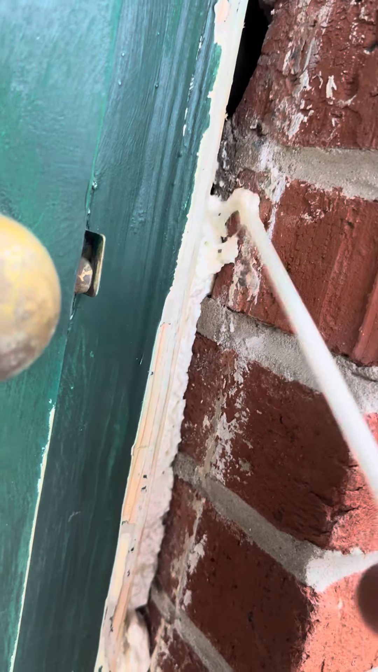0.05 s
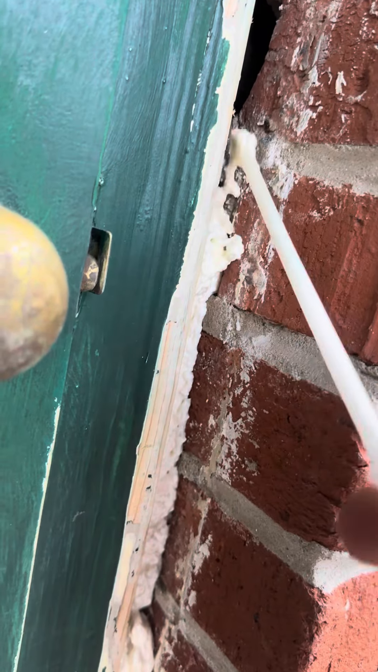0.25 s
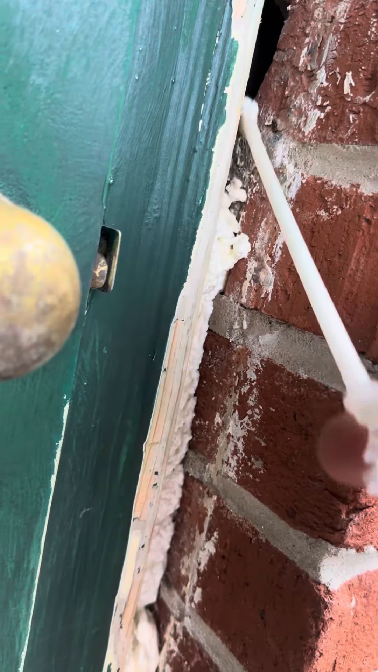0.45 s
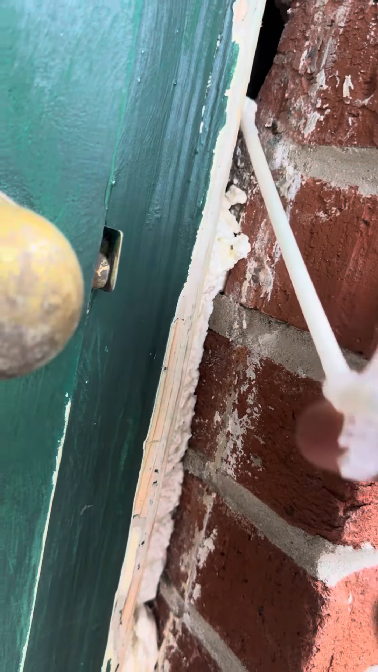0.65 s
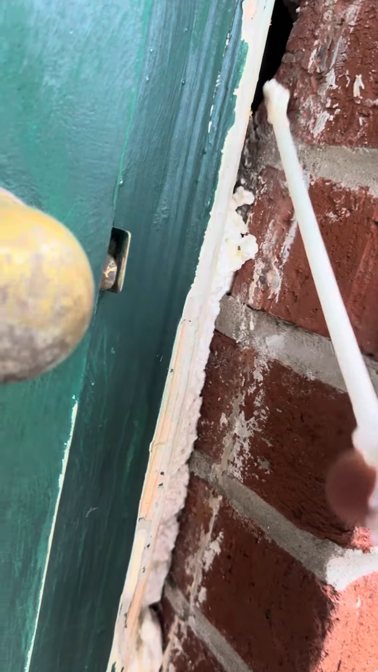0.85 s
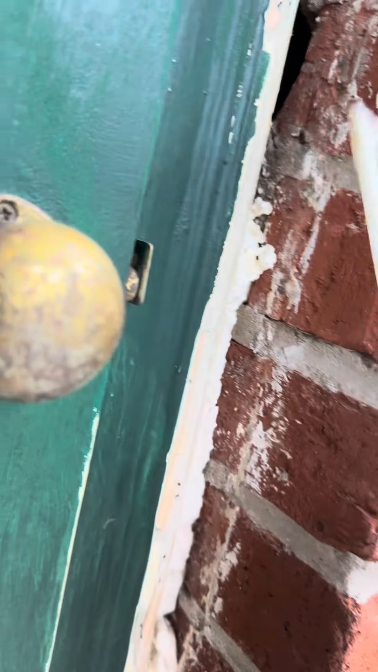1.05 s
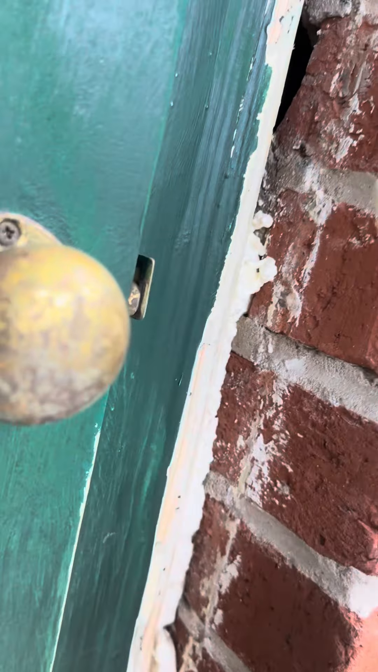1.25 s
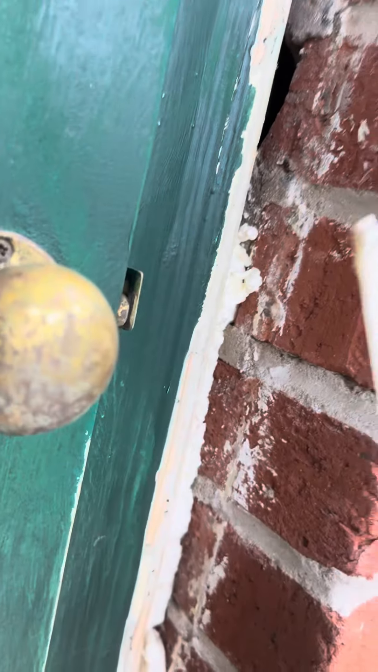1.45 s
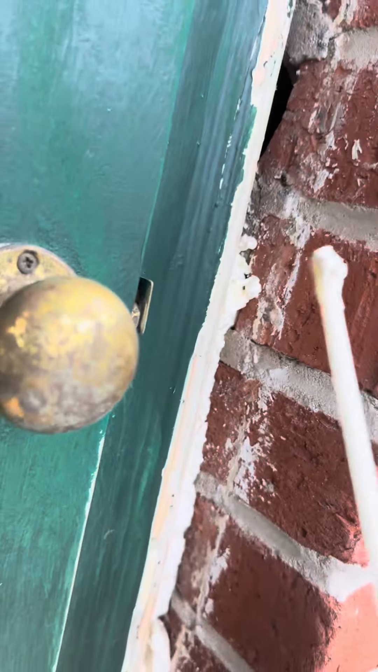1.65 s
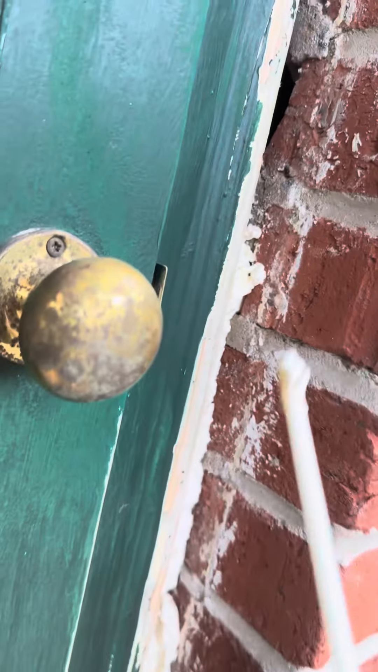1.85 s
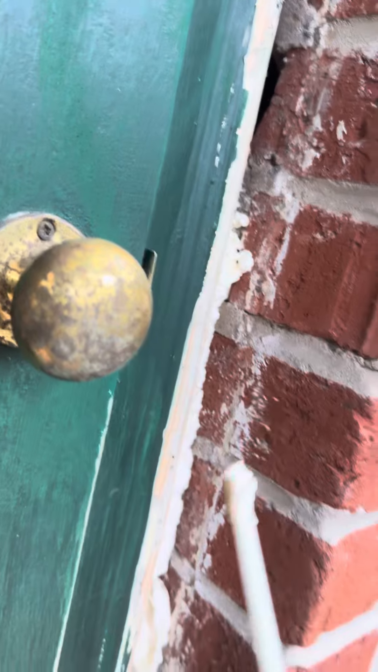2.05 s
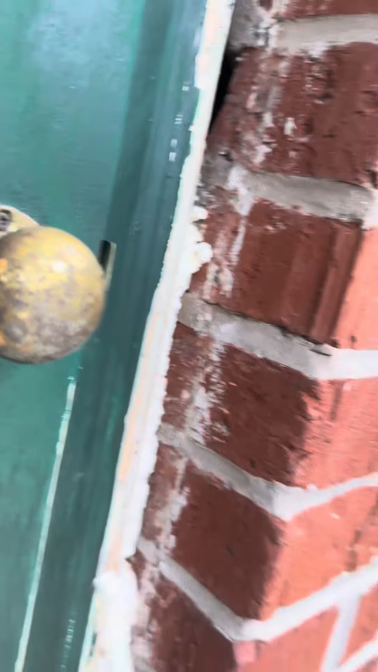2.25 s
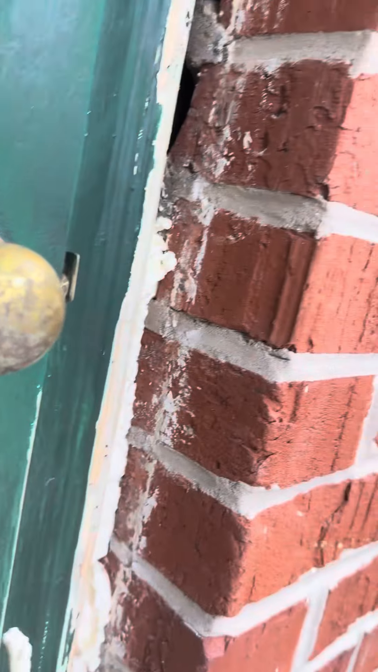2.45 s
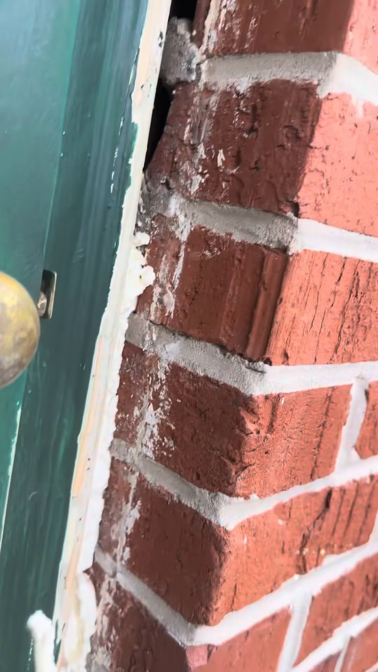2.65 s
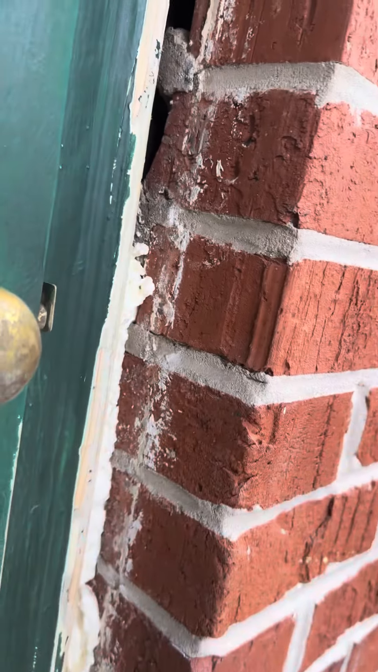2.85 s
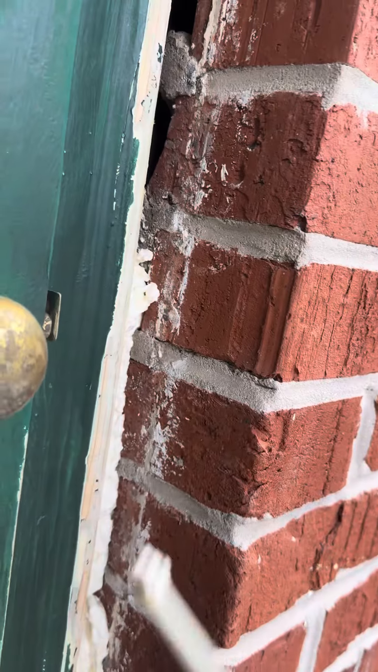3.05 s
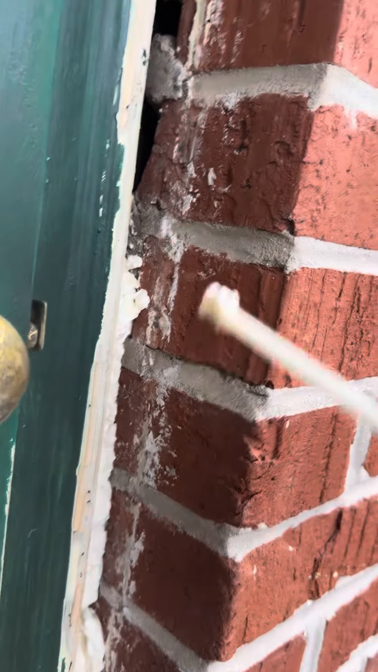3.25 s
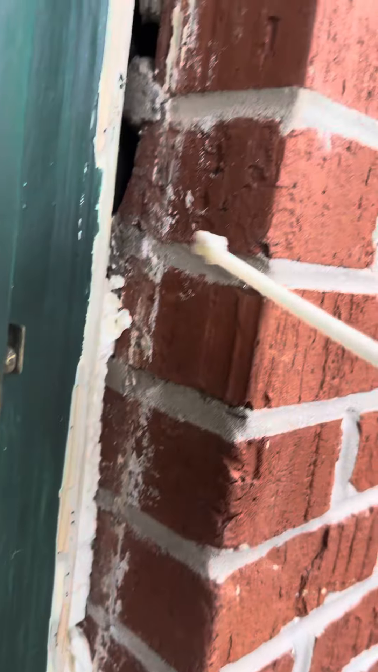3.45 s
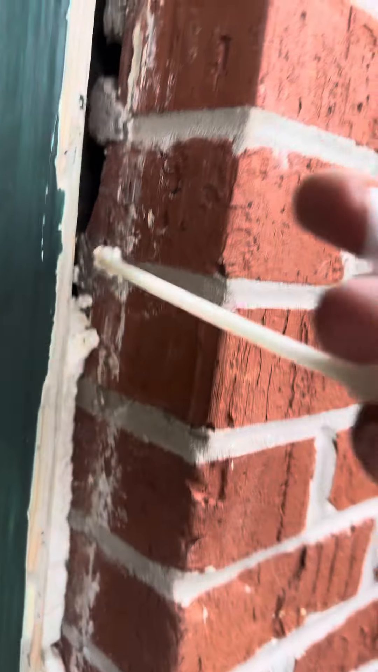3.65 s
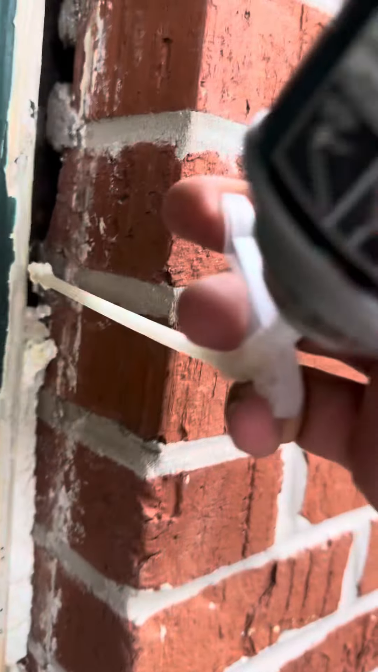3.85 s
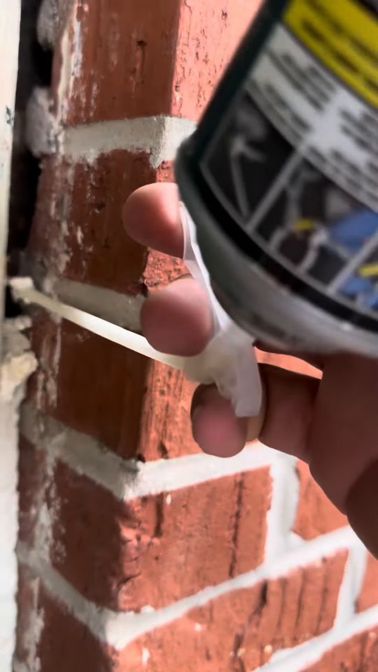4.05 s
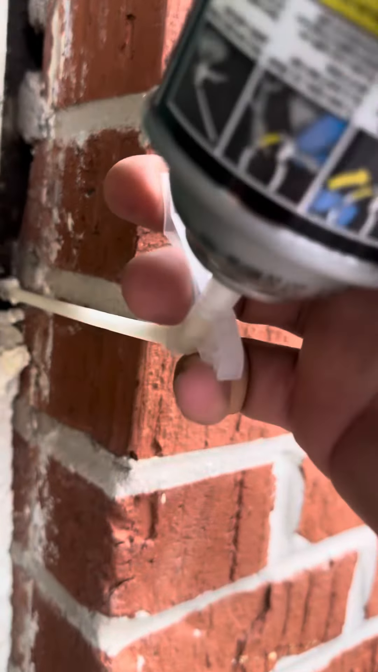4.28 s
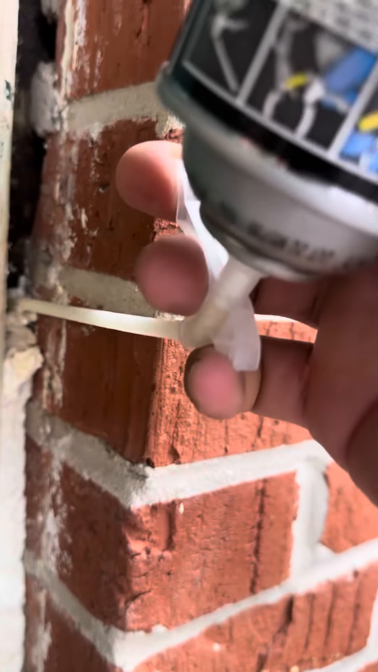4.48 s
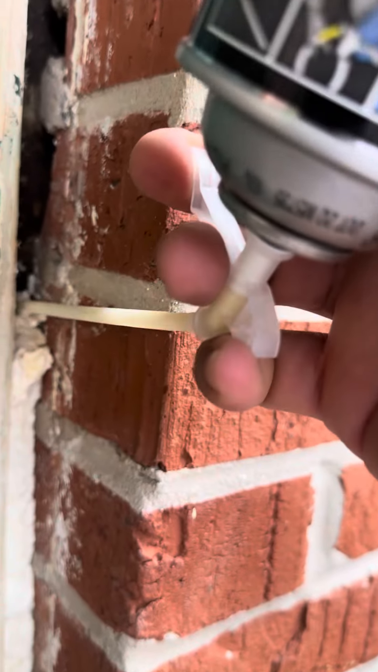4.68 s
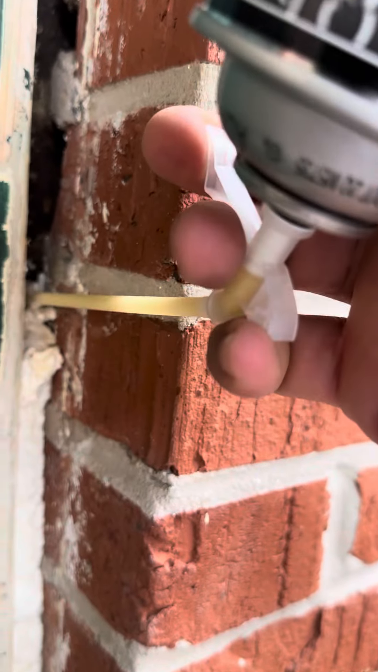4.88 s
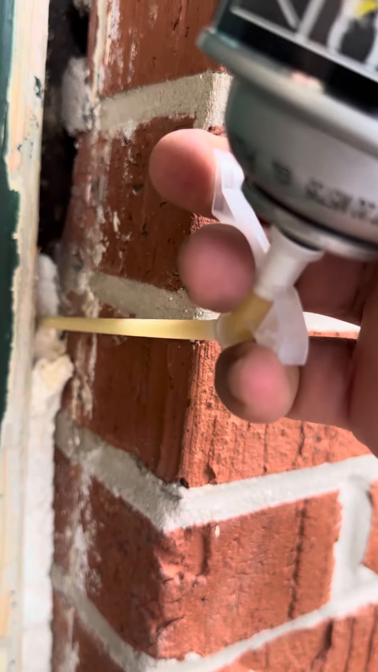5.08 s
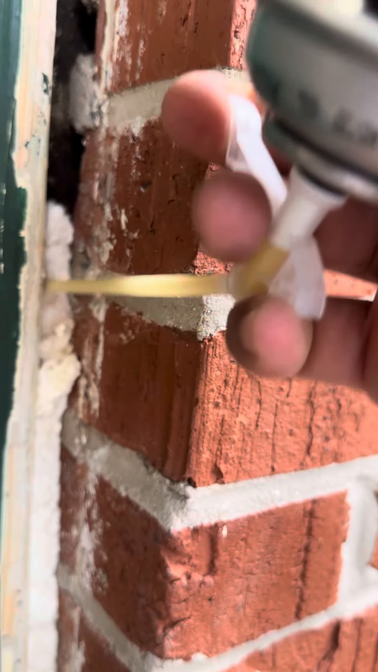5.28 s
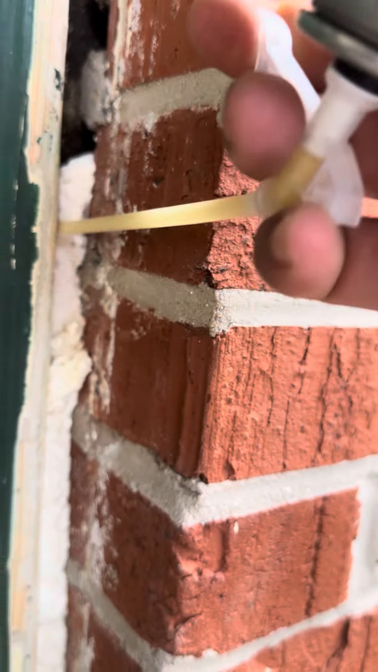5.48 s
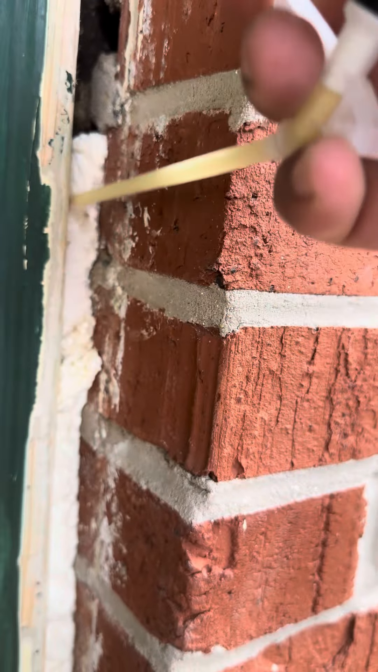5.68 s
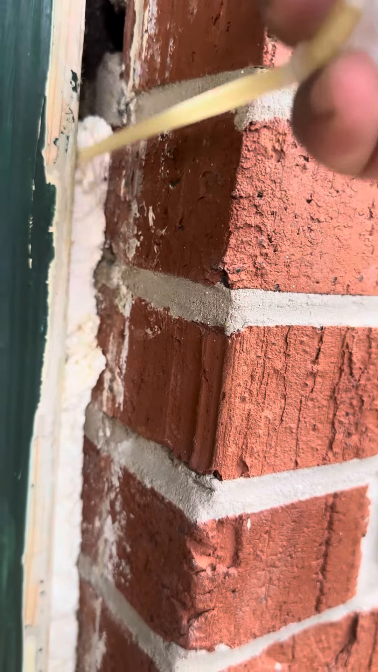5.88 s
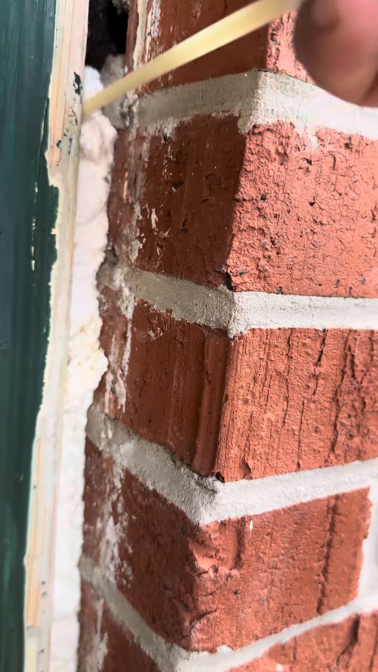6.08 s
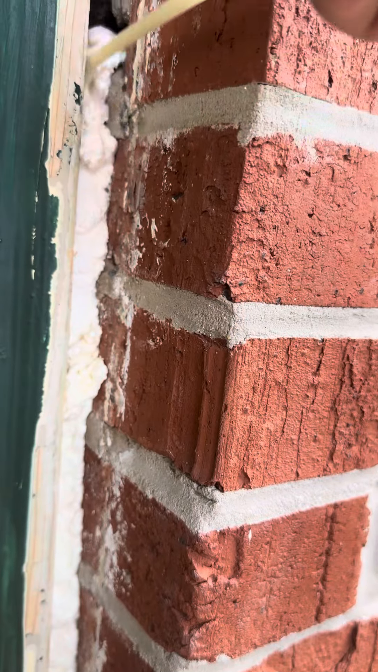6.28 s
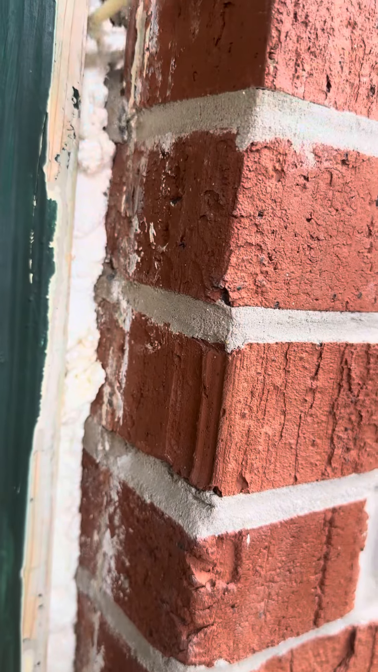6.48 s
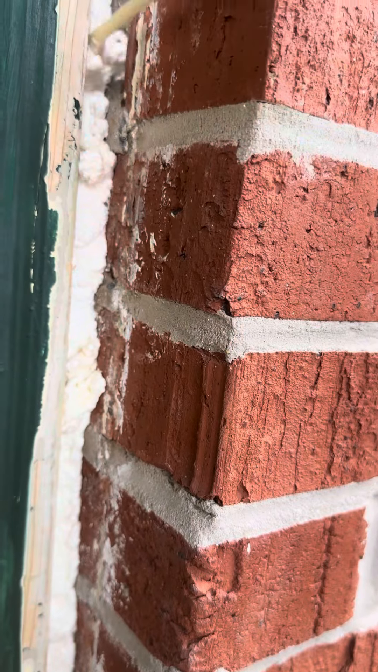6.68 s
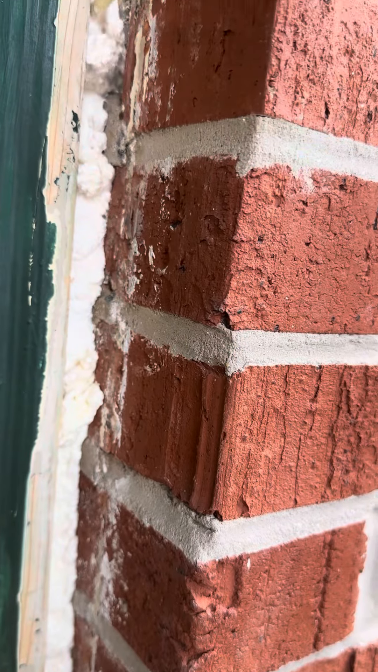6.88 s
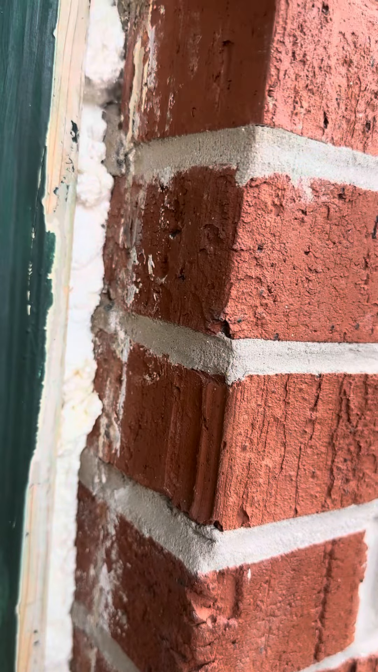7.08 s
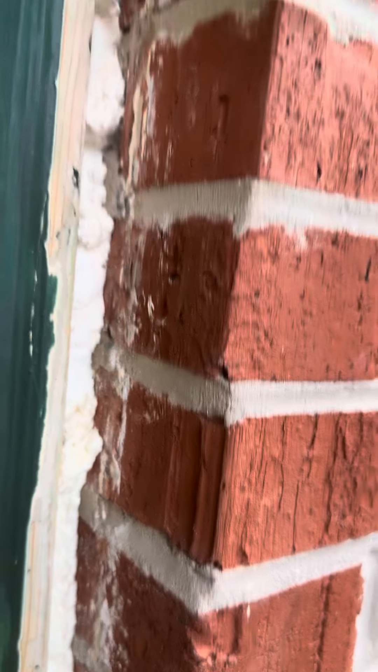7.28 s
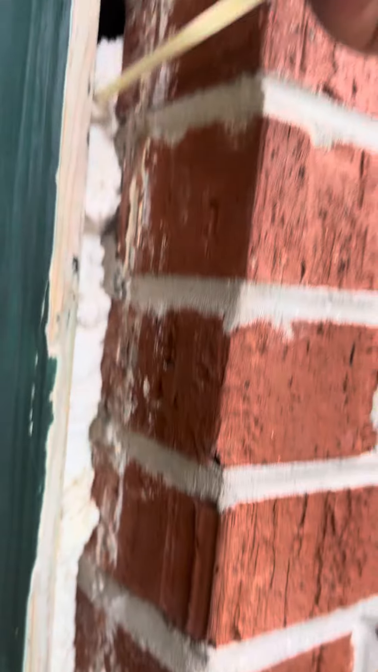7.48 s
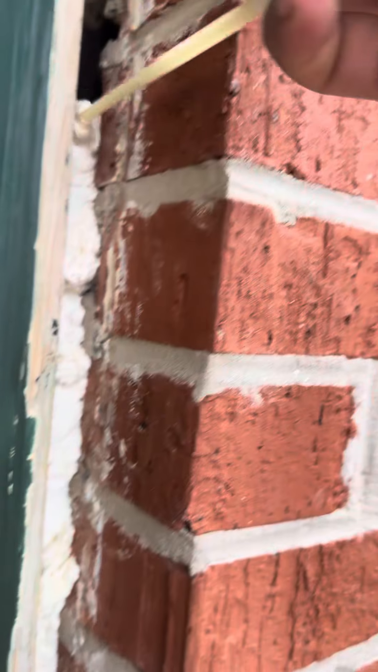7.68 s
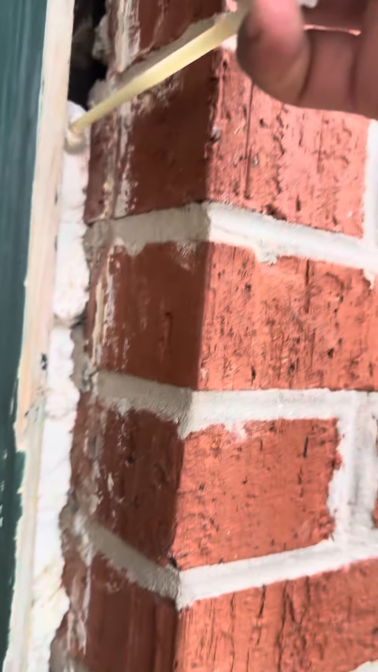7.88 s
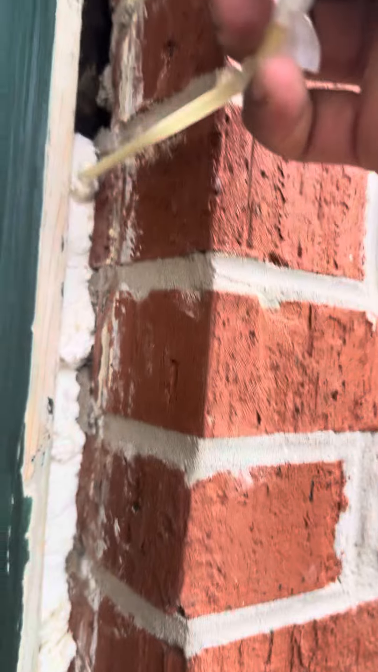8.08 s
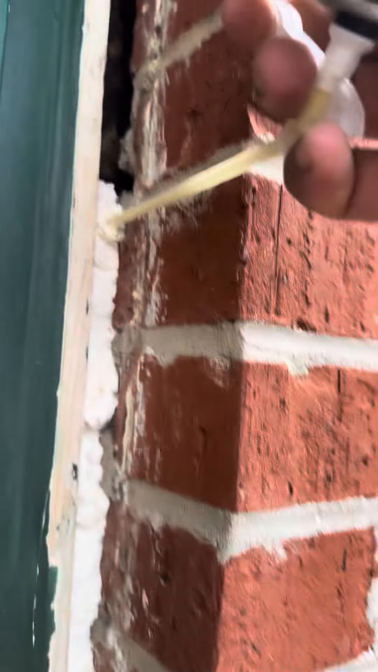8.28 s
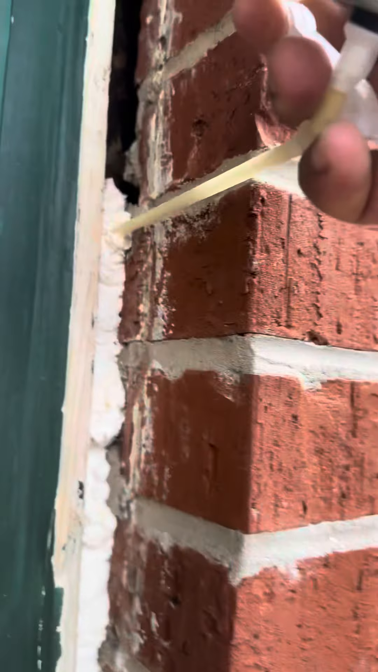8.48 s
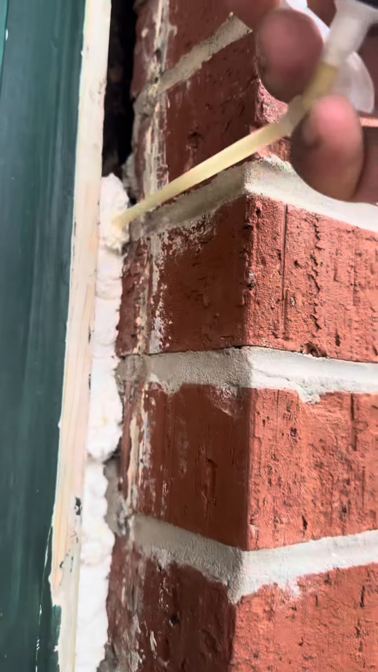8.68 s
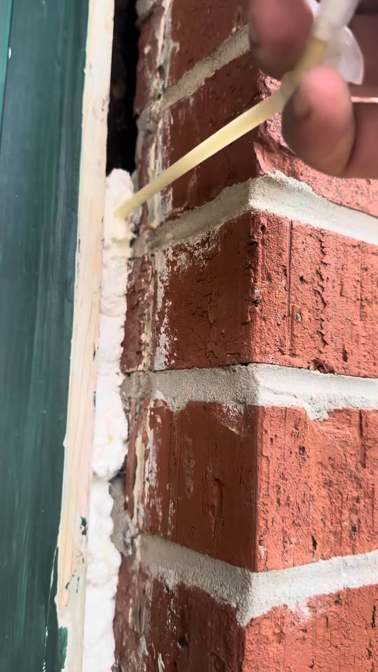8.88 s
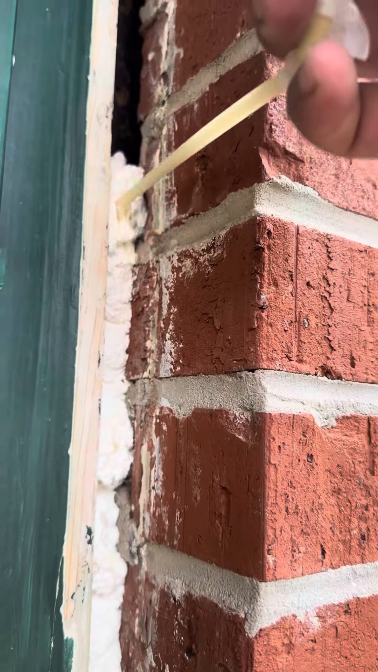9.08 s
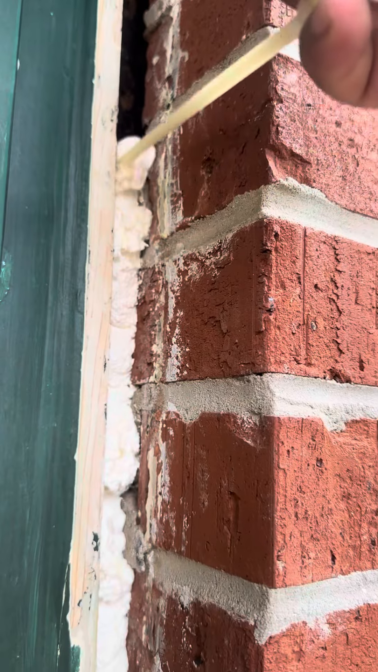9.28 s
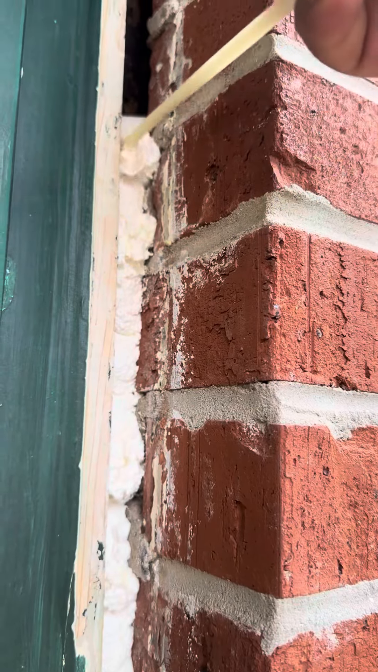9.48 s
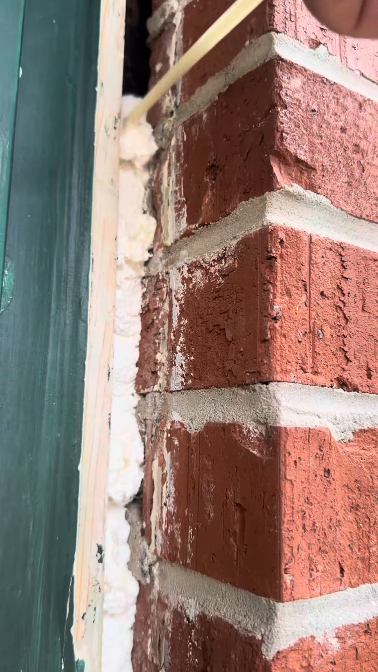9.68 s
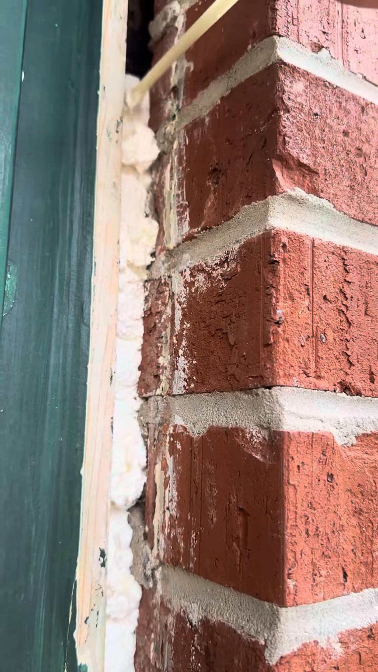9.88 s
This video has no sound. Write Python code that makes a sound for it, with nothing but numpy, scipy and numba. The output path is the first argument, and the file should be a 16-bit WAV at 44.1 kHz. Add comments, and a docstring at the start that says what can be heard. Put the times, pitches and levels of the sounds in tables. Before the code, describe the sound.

Quiet plastic clicks outdoors with a distant low hum, followed by a close, crackling, gurgling rush of expanding foam through a thin straw.

```python
"""An aerosol can squirts expanding foam through a thin straw into a gap by a door frame, close to a phone.
Random clicks stand for bursting cells; they ring the straw, gap and tip, duller when the tip is buried.
Before that, fingers tick and rustle on the can (fading tones, crackle), then propellant leaks (noise, clicks).
A distant machine hums (a tone of changing level) over town rumble (bands of noise)."""
import sys
import numpy as np
from scipy import signal
from scipy.fft import rfft, irfft, next_fast_len
from scipy.io import wavfile
from scipy.ndimage import uniform_filter1d
from numba import njit

SR = 44100
rng = np.random.default_rng(int(sys.argv[2]) if len(sys.argv) > 2 else 0)


def master(y):
    """Save y as 16-bit WAV."""
    cut = np.clip(np.atleast_2d(y).T, -1, 1)
    pcm = np.round(cut * 32767)  # scale
    wavfile.write(sys.argv[1], SR, pcm.astype(np.int16))


N = 438354  # length in samples


def undb(db):
    """Turn decibels into an amplitude factor."""
    return 10 ** (np.asarray(db) / 20)


def level(x, db):
    """Scale a sound to a given average (rms) level in dB."""
    return x * undb(db) / np.sqrt(np.mean(x ** 2))


def noise():
    """Plain random hiss, equally strong at all pitches."""
    return rng.standard_normal(N)


def curves(table):
    """Columns of a table as smooth-running curves, and a gate that is open within its span."""
    s, *columns = np.transpose(table)
    t = np.arange(N) / SR
    is_open = 1. * ((t >= s[0]) & (t <= s[-1] + .01))
    gate = uniform_filter1d(is_open, 400, mode="nearest")
    return [gate] + [np.interp(t, s, c) for c in columns]


@njit
def sweep(x, hz, width, low):
    """State-variable filter with a moving centre: band-pass of gain 1, or low-pass when low is 1."""
    y, b, l = np.empty(len(x)), 0., 0.
    for i in range(len(x)):
        g, k = np.tan(np.pi * hz[i] / SR), width / hz[i]
        v = (b + g * (x[i] - l)) / (1 + g * (g + k))
        y[i] = (1 - low) * k * v + low * (l + g * v)
        b, l = 2 * v - b, l + 2 * g * v
    return y


def band(x, hz, width, low=0.):
    """Keep the pitches around hz (fixed or moving), or mostly those below it when low is near 1."""
    return sweep(x + 1e-18, hz * np.ones(N), float(width), low)


def steep(x, hz, width):
    """The same band filter twice, so its sides fall faster."""
    return band(band(x, hz, width), hz, width)


def walk(rate):
    """Random drift around 0: levels held 1 / rate seconds, then smoothed twice; spread about a third."""
    k = int(SR / rate)
    steps = np.repeat(rng.standard_normal(N // k + 1), k)
    return 0.44 * uniform_filter1d(uniform_filter1d(steps, k), k)[:N]


def bursts(rate, spread_db):
    """Bursting bubbles: about rate clicks a second at random moments, a few far bigger than the rest."""
    out, at = np.zeros(N), np.flatnonzero(rng.random(N) < rate / SR)
    size, sign = rng.random((2, N // 3))[:, :len(at)]
    size_db = spread_db * np.minimum(-np.log(1 - size), 4)
    out[at] = np.sign(sign - .5) * undb(size_db)
    return out


def ring(source, modes, flicker_db):
    """Broad resonances, each rung by its own share of the source and flickering alone."""
    total = 0
    for hz, width, db in modes:
        total = total + level(steep(source(), hz, width), db) * undb(flicker_db * walk(21))
    return level(total, 0)


def colour(x, points):
    """Filter through (frequency [Hz], gain [dB]) points joined on a log-frequency axis."""
    hz, db = np.transpose(points)
    size = next_fast_len(N)
    bins_hz = 1 + np.arange(size // 2 + 1) * SR / size
    gain = undb(np.interp(np.log(bins_hz), np.log(hz), db))
    return irfft(rfft(x, size) * gain, size)[:N]


def puffs(table, t60):
    """Envelope that jumps at each (time [s], level [dB]) and falls 60 dB in t60 seconds."""
    out, t = np.zeros(N), np.arange(SR // 2) / SR
    for s, db in table:
        i = int(s * SR)
        out[i:i + len(t)] += (undb(db) * 10 ** (-3 * t / t60))[:N - i]
    return out


def swells(table):
    """Sum of bell-shaped changes in dB, one for each (time [s], length [s], change [dB])."""
    t = np.arange(N) / SR
    return sum(db * np.exp(-((t - s) / length) ** 2) for s, length, db in table)


def town():
    """Third-octave bands of far rumble that swell together and flicker alone."""
    # tone of the rumble before the whole is set to its level:
    # (frequency [Hz], relative level [dB per Hz])
    spectrum = [(15, -40), (25, -2.5), (134, 1.5), (156, -27.5), (186, -9.5), (251, -14), (356, -21),
                (458, -16), (574, -21.5), (2460, -38), (2780, -40), (5910, -44), (10000, -134),
                (13000, -103), (22000, -120)]
    hz_at, db_at = np.transpose(spectrum)
    out, swell = 0, walk(0.55)
    for hz in 28 * 2 ** np.arange(0, 8.4, 1 / 3):
        db = np.interp(np.log(hz), np.log(hz_at), db_at) + 10 * np.log10(hz)
        db = db + 0.27 * swell + 0.47 * walk(6.5)
        out = out + undb(db) * level(steep(noise(), hz, hz / 3), 0)
    return level(out, -45.5)


def machine():
    """A hum that swells and fades like beating tones, and a few blurred lower and higher tones."""
    # turning points of the hum, before a small random wobble: (time [s], pitch [Hz], level [dB rms])
    turning_points = [(0, 129.4, -49), (.39, 134.3, -43), (.8, 130.8, -53), (1.05, 130.4, -50),
                      (1.3, 132.5, -63), (1.68, 132, -41), (1.98, 132.3, -57), (2.27, 132.3, -38.5),
                      (2.6, 132.4, -58), (2.9, 130.6, -38), (3.26, 129.6, -43.5), (3.7, 130.8, -35.5),
                      (4.3, 129.4, -58), (4.52, 129, -54), (4.95, 130, -33.5), (5.25, 132.4, -39),
                      (5.45, 129, -55), (5.62, 130, -62), (5.8, 130.2, -53), (6.23, 130, -33.5),
                      (6.6, 130.5, -46), (6.779, 131, -63), (7.04, 129.5, -47), (7.2, 132.2, -41),
                      (7.62, 130.4, -38.5), (7.93, 132, -57), (8.25, 130.8, -46.5), (8.37, 132, -49),
                      (8.68, 131, -39.5), (9.0, 131.6, -45), (9.14, 131.3, -54), (9.42, 132, -48),
                      (9.68, 131, -44), (9.94, 131.5, -44.5)]
    # blurred tones: (frequency [Hz], width [Hz], level [dB rms])
    drones = [(60.8, 0.54, -49.5), (78.55, 1.4, -51), (172.4, 1.8, -58), (230.3, 4.5, -63.5),
              (265.6, 5, -61)]
    s, hz, db = np.transpose(turning_points)
    t, turns = np.arange(N) / SR, np.arange(len(turning_points))
    at = np.interp(t, s, turns)
    # power follows half a cosine from one turning point to the next
    eased = at // 1 + (1 - np.cos(np.pi * (at % 1))) / 2
    power = np.interp(eased, turns, undb(2 * db))
    phase = 2 * np.pi * np.cumsum(np.interp(t, s, hz)) / SR
    hum = np.sqrt(2 * power) * undb(0.65 * walk(9)) * np.sin(phase)
    return hum + sum(level(band(noise(), f, width), d) for f, width, d in drones)


def fingers():
    """Each tick rings the plastic trigger a little differently, leaves a scuff and starts crackling skin."""
    # finger ticks on can and trigger:
    # (time [s], strength [dB], extra ring of the dull modes [dB], strength of the slide that follows [dB])
    tick_table = [(0.0144, -49, 2, -64), (0.0657, -39, -3, -60), (0.108, -46.5, 2, -61),
                  (0.2793, -55, -9, -70), (0.3092, -47.5, -15, -80), (0.375, -46, -2, -75),
                  (0.403, -35, -10, -76), (0.6854, -49, -3, -78), (0.8175, -51, -5, -80),
                  (1.0, -56, -5, -64), (1.048, -45, 1, -74), (1.15, -49, -4, -80), (1.189, -53, 11, -62),
                  (1.254, -49, 5, -57), (1.3913, -43, -2, -63), (1.603, -48, -8, -59),
                  (1.8387, -51, -8, -56), (2.0077, -57, -7, -55), (2.2495, -56, -4, -60),
                  (2.3548, -60, -5, -57), (2.4, -47.5, 6, -68), (2.4548, -48, -3, -76),
                  (2.6396, -50, 0, -59), (2.6584, -31.5, -7.5, -55), (2.672, -49, -3, -68),
                  (2.692, -53, 1, -72), (3.1394, -48, -2, -76), (3.3333, -50, -1, -79),
                  (3.8392, -50, -5, -75), (3.97, -49, 0, -62), (4.2, -50, 4, -82), (4.336, -47.5, -3, -72),
                  (4.423, -38, -17, -80)]
    # ring of the trigger, before each tick varies it: (pitch [Hz], level [dB], time to fall 60 dB [s])
    trigger = [(1080, -2, 0.023), (2150, -5, 0.013), (3120, 0, 0.006), (6040, 6, 0.0033), (706, 1, 0.014),
               (4530, 6, .003)]
    bright_db, tick_rise_s = -4, 0.00047
    # ticks softer than firm_db ring less; firmer ones scuff little more
    firm_db, ring_per_db, scuff_per_db = -42, .5, .3
    scuff_t60_s, slide_t60_s, scrape_t60_s = 0.016, 0.18, 0.051
    scuff_n, slide_n = int(.005 * SR), int(0.013 * SR)  # softened starts, in samples

    ticks, t = np.zeros(N), np.arange(SR // 10) / SR
    hz, mode_db, t60 = np.transpose(trigger)[:, :, None]
    grips = rng.standard_normal((len(tick_table), 2, len(trigger), 1))
    for (s, db, dull_db, _), grip in zip(tick_table, grips):
        tilt_db = np.array([[dull_db], [0], [0], [bright_db], [dull_db], [bright_db]])
        share_db = mode_db + tilt_db + 2.3 * grip[0] + ring_per_db * min(db - firm_db, 0)
        tones = np.sin(2 * np.pi * hz * (1 + .04 * grip[1]) * t)
        modes = undb(db + share_db) * tones * 10 ** (-3 * t / t60)
        modes = modes * (1 - np.exp(-t / tick_rise_s))
        ticks[int(s * SR):int(s * SR) + len(t)] += modes.sum(axis=0)

    rows = np.array(tick_table)
    times, tick_db = rows[:, 0], rows[:, 1]
    soft = np.c_[times, tick_db - (1 - scuff_per_db) * np.maximum(tick_db - firm_db, 0)]
    scuff = uniform_filter1d(puffs(soft, scuff_t60_s), scuff_n)
    scuff = scuff * level(band(bursts(12000, 2.2), 2500, 6000), -5.5)
    # skin is never quite still: a faint drifting floor under each rub
    bright = uniform_filter1d(puffs(rows[:, ::3], slide_t60_s), slide_n) + undb(-82 + 4.0 * walk(12))
    dull = uniform_filter1d(puffs(rows[:, :2], scrape_t60_s), slide_n) * undb(-17.5)
    dull = dull + undb(-70.5 + 4.0 * walk(11))
    slide = [level(steep(bursts(3600, 3.6), 5200, 9000), -3.8) * bright for _ in range(2)]
    scrape = level(steep(bursts(2300, 5.8), 2300, 3000), -2.2) * dull
    direct = ticks + scuff + scrape + slide[0]
    back = undb(-7) * np.diff(ticks + scuff, prepend=0) + undb(-7.5) * slide[1]
    return np.array([direct, back])


def pings():
    """The can's wall pings briefly: each ping is one short fading tone."""
    # (time [s], strength before the softened start [dB], pitch [Hz], time to fall 60 dB [s])
    ping_table = [(0.403, -43, 2250, .013), (1.7462, -46, 1250, 0.051), (2.6598, -41, 2100, .01),
                  (2.6835, -48, 1061, 0.056), (2.692, -51, 2060, 0.026)]
    rise_s = 0.0014
    out, t = np.zeros(N), np.arange(SR // 10) / SR
    for s, db, hz, t60 in ping_table:
        fade = 10 ** (-3 * t / t60) * (1 - np.exp(-t / rise_s))
        out[int(s * SR):int(s * SR) + len(t)] += undb(db) * np.sin(2 * np.pi * hz * t) * fade
    return out


def leak():
    """Smooth gas hiss, then wet gurgling as liquid climbs the straw; the hiss also comes back off the wall."""
    # propellant leaking before the froth arrives: (time [s], hiss [dB], gurgle before its flutter [dB])
    leak_table = [(4.4, -84, -70), (4.425, -49, -70), (4.49, -35, -87), (4.606, -37, -46),
                  (4.782, -43.5, -45), (4.84, -28, -33.5), (4.86, -37, -34)]
    # tone of the hiss: (frequency [Hz], width of each filter pass [Hz], relative level [dB])
    hiss_modes = [(2810, 840, -0.5), (4400, 6200, 5.5), (7640, 4900, 5), (11190, 3700, 8),
                  (14200, 3000, 8.5)]
    gate, hiss_db, gurgle_db = curves(leak_table)
    hiss = ring(noise, hiss_modes, .6) * undb(hiss_db)
    gurgle = level(steep(bursts(1500, 3.6), 730, 1600), 0) * undb(gurgle_db + 1.2 * walk(85))
    back = level(steep(noise(), 9430, 12000), -0.9) * undb(hiss_db)
    return np.array([hiss + gurgle, back]) * gate


def pockets(source, hz, spread, width, count):
    """Gas pockets in the foam: narrow rings that swell, drift and close again around a centre."""
    total = 0
    for _ in range(count):
        pocket = steep(source(), hz * np.exp(spread * walk(7)), width)
        total = total + pocket * undb(10. * walk(18))
    return level(total, 0)


def shut(x, hz):
    """A firm upper edge: three low-passes and a hollow just above them."""
    for width in (3200, 2490, 1530):
        x = band(x, hz, width, low=0.97)
    return x - .45 * band(x, 1.1 * hz, 600)


def froth():
    """Cells burst in quick clumps, as slugs of foam and gas pass, and ring straw, gap, mouth and tip."""
    # base course of the froth, before drift and clearings: (time [s], flow level [dB],
    # gap pitch [Hz], gap over flow [dB], open-tip pitch [Hz], tip over flow [dB], spit over flow [dB])
    flow_table = [(4.78, -45, 1820, -6, 4110, -26, -19), (4.85, -30, 1900, 7, 4300, 10.5, 3.5),
                  (4.9, -24.5, 2210, 5.5, 3850, 5, -9), (4.98, -24.5, 1690, 8, 3920, -5, -9),
                  (5.1, -25.5, 1484, -6.5, 4060, -12.5, -12), (5.22, -27.5, 1490, -5, 4500, -6.5, -19.5),
                  (5.37, -27, 1510, 0.5, 4020, -4, -12.5), (5.58, -28.5, 1560, -7.5, 4340, -10, -22),
                  (5.66, -30.5, 2030, -3, 3650, -7, -14.5), (5.79, -28, 2000, -2, 3900, -10, -18),
                  (5.86, -29, 1630, -1.5, 3660, -10, -16), (6.05, -29.5, 1730, 1.5, 3780, -3.5, -11.5),
                  (6.22, -28.5, 1640, 4.5, 4000, -3.5, -12), (6.45, -28.5, 1720, 1, 3530, -4, -6),
                  (6.63, -27.5, 1720, -2, 4070, -5, -12), (6.76, -27, 1810, -2.5, 3570, -3.5, -29),
                  (6.84, -26.5, 1620, -6, 3500, -13, -25), (6.96, -29, 1890, -4, 4180, -7.5, -15.5),
                  (7.01, -29.5, 1880, -0.5, 3950, 0, 0), (7.14, -29, 1540, -2.5, 3900, -1, -9),
                  (7.25, -28.5, 1390, -1, 3720, -3.5, -4.5), (7.34, -29, 1360, -6, 3400, -0.5, -11),
                  (7.5, -26, 1630, -6.5, 3650, -9.5, -13), (7.72, -28, 1450, -1.5, 3720, -6, -8.5),
                  (7.82, -28, 1970, 0, 3900, 0.5, -4.5), (7.95, -28, 1470, 2, 3960, -6, -10),
                  (8.05, -27.5, 1640, -14, 3750, -12, -20.5), (8.5, -32, 1370, -8, 4200, -23.5, -22),
                  (8.63, -28, 1370, -11, 3630, -19, -20.5), (8.88, -23.5, 1770, -3.5, 3880, -19.5, -32.5),
                  (9.05, -24, 1520, -3, 3890, -21, -31), (9.17, -23.5, 1470, -0.5, 4160, -17, -26),
                  (9.31, -26.5, 1550, 0.5, 4340, -6.5, -21), (9.47, -25, 1625, 1.5, 4160, -18, -20.5),
                  (9.7, -25, 1450, -1.5, 4270, -9.5, -16), (9.94, -25, 1840, -0.5, 3750, -6, -14)]
    # the tip breaks free of the foam for a moment:
    # (time [s], length [s], change of the tip's ring [dB], change of the spit [dB])
    clearings = np.array([(5.135, 0.036, 2, 3), (5.396, 0.027, 3, 10), (5.962, 0.032, -3, 1),
                          (6.127, 0.028, -4, 3), (6.306, 0.035, 0, 1.5), (6.41, 0.018, -7, 4.5),
                          (6.679, 0.03, 7, 18.5), (7.25, 0.02, 11, -0.5), (7.051, 0.015, 2.5, -4.5),
                          (7.136, .02, 4.5, -1), (7.428, 0.012, 6, 5), (7.538, 0.01, 8, 1),
                          (7.63, 0.02, 6, 5), (8.191, 0.023, 9, -1), (8.32, 0.039, 8, -2),
                          (8.845, 0.02, 5, 3), (8.963, 0.031, 3.5, -7), (9.512, 0.047, 10.5, 2),
                          (9.592, 0.047, 2, 4.5), (9.68, 0.031, 3.5, 5), (9.784, 0.028, -0.5, 7),
                          (9.91, 0.018, -2, 4.5)])
    # changes of the mouth ring near 3 kHz: (time [s], length [s], change [dB])
    mouth_changes = [(5.33, 0.023, 12.5), (5.98, 0.075, 9.5), (6.29, 0.074, 12), (6.46, 0.052, 7.5),
                     (6.66, 0.04, 10), (6.75, 0.089, 16.5), (7.16, 0.09, 11), (7.41, 0.049, 4),
                     (8.103, 0.13, 1), (9.55, 0.3, -3.5)]
    # how clearly narrow rings stand out of the roar:
    # (time [s], straw ring before drift [Hz], straw ring [dB], gap core [dB])
    ring_table = [(4.78, 1090, -8, -13.5), (5.0, 1090, -4.5, -6), (5.12, 1040, -4, 3.5),
                  (5.33, 1074, 1, 1.5), (5.5, 985, 1, -1.5), (5.62, 1014, 0.5, -3), (5.75, 1065, -4.5, -1),
                  (5.9, 984, -5, -7.5), (6.1, 1055, -2.5, 0), (6.3, 1080, -14, -7.5), (6.42, 966, -6, -10),
                  (6.65, 1100, -8, -15), (6.95, 1010, -6.5, -13), (7.1, 1094, -3.5, -13),
                  (7.5, 1065, -6, -14.5), (7.83, 1110, -9, -8), (8.07, 1000, -7, -11), (8.45, 1100, -6, -6),
                  (8.8, 975, -7, -6.5), (9.05, 1105, -5, -9), (9.4, 1030, -5.5, -19),
                  (9.94, 1014, -4.5, -7)]
    # foam narrows the gap's mouth: (time [s], edge above which little passes [Hz], low gurgle [dB])
    edge_table = [(4.78, 2978, 3), (5.0, 2840, -3.5), (5.1, 2930, 0.5), (5.35, 2970, 0), (5.6, 2860, 3.5),
                  (5.8, 2870, 4), (5.84, 2439, 2.5), (6.18, 2260, 3), (6.36, 2260, 2), (6.44, 2830, 1),
                  (6.6, 2610, 0), (6.9, 2550, 2), (7.02, 3100, 2.5), (7.27, 3130, -0.5), (7.35, 2500, 0.5),
                  (7.6, 2790, 0), (7.75, 2580, 0.5), (7.86, 2630, 0.5), (7.94, 2360, 0), (8.03, 3040, 1.5),
                  (8.3, 2740, 2.5), (8.58, 2330, 2), (8.68, 2730, -1), (8.75, 2340, -0.5),
                  (8.85, 2790, -2.5), (9.08, 2600, -3), (9.18, 2260, -1.5), (9.75, 2370, -4),
                  (9.94, 2480, -1.5)]
    # steady ring of the slot between frame and brick, before flutter: (time [s], level over flow [dB])
    slot_table = [(4.78, -13), (4.95, -10), (5.1, -15), (5.35, -14), (5.75, -13.5), (5.9, -23), (6.3, -23),
                  (6.5, -17), (6.9, -19), (7.1, -12), (7.6, -18), (8.05, -17), (8.2, -16), (8.5, -20),
                  (8.72, -16), (8.9, -17.5), (9.15, -22), (9.4, -20.5), (9.7, -24), (9.94, -20)]
    # resonances of straw, spit from the open tip, and low modes of the wet straw:
    # (frequency [Hz], width of each filter pass [Hz], relative level [dB])
    straw_modes = [(946, 380, -3), (1155, 750, -2), (1470, 160, -11)]
    spit_modes = [(6070, 3500, 20), (7880, 530, 5), (10680, 1500, 11.5), (15550, 3000, -7.5)]
    gurgle_modes = [(277, 264, 0), (441, 185, 0.021)]

    gate, flow_db, gap_hz, gap_db, tip_hz, tip_db, spit_db = curves(flow_table)
    _, ring_hz, ring_db, core_db = curves(ring_table)
    _, edge_hz, low_db = curves(edge_table)
    _, slot_db = curves(slot_table)
    clear_db, spray_db = swells(clearings[:, :3]), swells(clearings[:, [0, 1, 3]])

    sputter_db = 1.5 * walk(14)  # foam also closes and clears the tip at random
    tip_db = tip_db + clear_db + sputter_db + 1.5 * walk(20)
    # the mouth follows the tip's ring by 0.42 dB per dB
    mouth_db = -11.5 + 0.42 * tip_db + swells(mouth_changes) + 3.5 * walk(24)
    spit_db = spit_db + spray_db + sputter_db + 1.5 * walk(20)
    gap_hz = gap_hz * np.exp(.04 * walk(12))
    gap_db = gap_db + 1.5 * walk(22) + 0.085 * clear_db
    flow_db = flow_db + .8 * walk(25)
    slugs, spurts = walk(220), walk(30)

    def cells():
        return bursts(5000, 2.5) * undb(2.8 * slugs + .7 * spurts)

    def fine():
        return bursts(9000, 5.5) * undb(4.0 * slugs + 4.1 * spurts)

    straw = ring(cells, straw_modes, 0.16)
    straw = straw + level(steep(cells(), ring_hz * np.exp(.05 * walk(10)), 190), 0) * undb(ring_db)
    straw = straw + level(steep(cells(), 605, 280), -6) * undb(low_db)  # lowest mode follows the gurgle
    # the foam-lined gap passes little far from its resonance
    gap = level(steep(steep(cells(), gap_hz, 2100), gap_hz, 2100), -2.5)
    gap = gap + level(steep(cells(), gap_hz, 280), 0) * undb(core_db)  # its firm core
    gap = gap + undb(-8.0) * pockets(cells, 1.15 * gap_hz, 0.513, 140, count=3)
    gap = gap + level(steep(cells(), .92 * edge_hz, 240), -14)  # the gap's lip, just under the edge
    slop_db = -4 + 2.4 * walk(70)  # wet slopping in straw and gap
    body = shut(straw + gap * undb(gap_db), edge_hz) * undb(slop_db)
    body = body + ring(cells, gurgle_modes, .3) * undb(-15 + low_db)

    mouth = level(steep(fine(), 3040 * np.exp(.04 * walk(9)), 380), 0)  # a wavering ring
    tip = level(steep(fine(), tip_hz, 1900), -2.0) + level(steep(fine(), tip_hz, 600), -10)
    tip = tip + undb(-7) * pockets(fine, tip_hz, .3, 450, count=3)
    spit = ring(fine, spit_modes, 1.2)
    gas = level(steep(noise(), 11800, 12000), -27.0)  # propellant seeps out with the flow
    slot = level(steep(cells(), 2644, 330), 0) * undb(slot_db + 2.0 * walk(20))
    direct = body + slot + mouth * undb(mouth_db) + tip * undb(tip_db) + spit * undb(spit_db) + gas
    # spray thrown back by brick and door swells less than the direct spit
    back = level(band(fine(), 8000, 9000), 2) * undb(.7 * spit_db)
    back = back + level(steep(cells(), 1500, 2400), 6)
    return np.array([direct, back]) * undb(flow_db) * gate


def pops():
    """Big cells burst at the open tip: each is a sharp snap and a few ms of bright crackle."""
    # (time [s], strength before filtering [dB])
    pop_table = [(4.805, -18), (4.827, -14), (4.834, -10), (4.8496, -15), (5.2563, -23), (5.321, -18),
                 (5.8654, -24), (6.357, -20), (6.4538, -16.5), (6.9865, -12), (7.122, -13.5), (7.163, -35),
                 (7.239, -13), (7.4194, -14), (7.6363, -14), (7.799, -17), (7.9927, -16.5), (9.651, -25)]
    snap = np.zeros(N)
    for s, db in pop_table:
        snap[int(s * SR)] = undb(db + 1)
    crackle = puffs(pop_table, 0.0077) * level(steep(noise(), 3700, 5000), -5.0)
    return band(snap, 5500, 8000) + crackle


def knock():
    """One dull bump through the phone's body, made of low fading tones."""
    # (time [s], strength [dB])
    knocks = [(6.999, -21)]
    # what the body rings with: (pitch [Hz], level over the strength [dB], time to fall 60 dB [s])
    body_modes = [(87, 3, 0.067), (150.6, -11, 0.091)]
    t, out = np.arange(N) / SR, np.zeros(N)
    for s, db in knocks:
        for hz, mode_db, t60 in body_modes:
            fade = (t > s) * 10 ** (-3 * np.abs(t - s) / t60)
            out += undb(db + mode_db) * np.sin(2 * np.pi * hz * (t - s)) * fade
    return out


def scene():
    """Mix all sources into two channels: a shared middle, and a side part added to one, taken off the other."""
    # tone of the middle channel, nearly empty from 10.6 to 13 kHz: (frequency [Hz], gain [dB])
    mid_tone = [(2200, 1), (2450, 1), (2800, 0.5), (3200, -3), (3700, -1.5), (5200, -1.5), (6000, -0.5),
                (7500, -1), (8500, -5.5), (9800, -13), (10600, -46.5), (13000, -54.5), (14000, -19),
                (16000, -5.5)]
    # tone of the side part, which the two channels carry in opposition: (frequency [Hz], gain [dB])
    side_tone = [(40, -37.5), (150, -66.5), (400, -24), (800, -13.5), (1500, -23), (2800, -20), (4500, -31),
                 (6000, -10.5), (7500, -4), (9500, -8.5), (12500, -17.5), (15000, -3)]
    direct, back = froth() + leak() + fingers()
    direct = direct + pings()
    direct = direct - 0.55 * band(direct, 2893, 200)  # the door's echo weakens a narrow band
    mid = colour(direct + pops() + town(), mid_tone) + knock() + machine()
    # the side part holds the direct sound shifted by a quarter cycle, which widens it
    shifted = signal.hilbert(direct + undb(-14.0) * mid, next_fast_len(N)).imag[:N]
    # low mids lean right, higher mids lean left
    lean = -undb(-31.0) * band(mid, 570, 420) + undb(-27.5) * band(mid, 3000, 2640)
    air = level(steep(noise(), 570, 780), -64.0) + level(steep(noise(), 3500, 6000), -77.5)
    air = air + level(band(noise(), 90, 150), -81)
    side = lean + colour(undb(-15.5) * back + shifted, side_tone) + air
    return mid + side * np.array([[1], [-1]])


def record(dry):
    """The phone loses the deepest bass (below 32 Hz) and cuts the top (above 15900 Hz)."""
    bass_cut = signal.butter(2, 32, "highpass", fs=SR, output="sos")
    top_cut = signal.ellip(10, .2, 80, 15900, fs=SR, output="sos")
    return signal.sosfilt(top_cut, signal.sosfilt(bass_cut, dry))


dry = scene()
out = record(dry)
master(out)
```